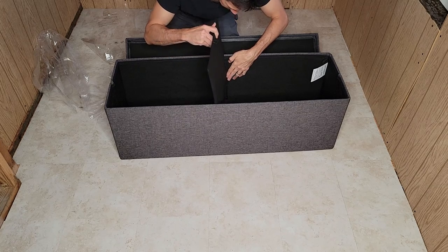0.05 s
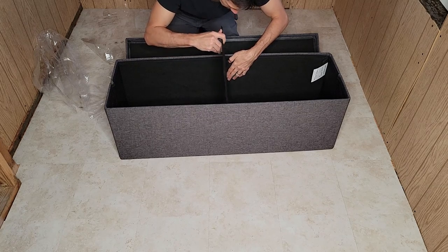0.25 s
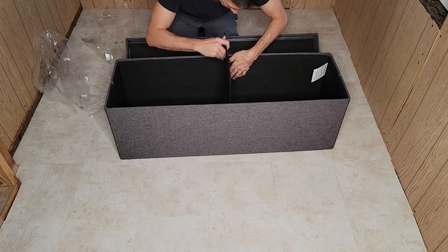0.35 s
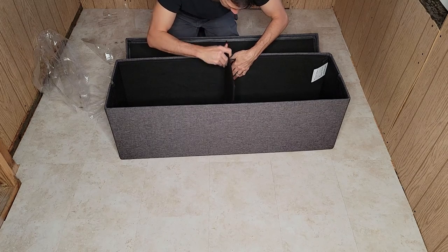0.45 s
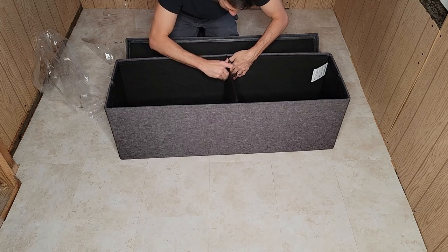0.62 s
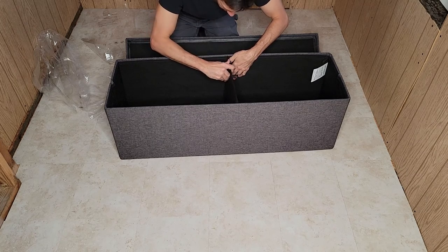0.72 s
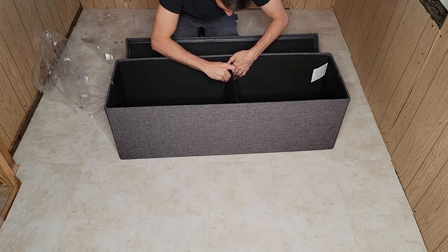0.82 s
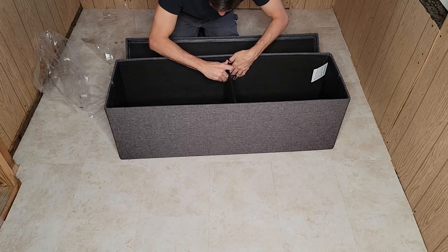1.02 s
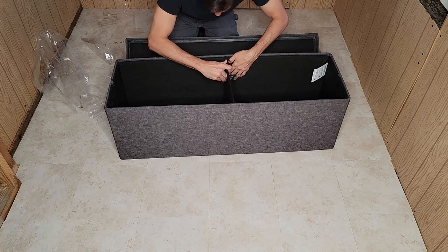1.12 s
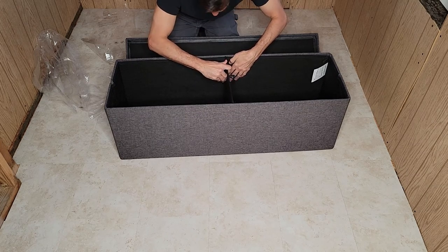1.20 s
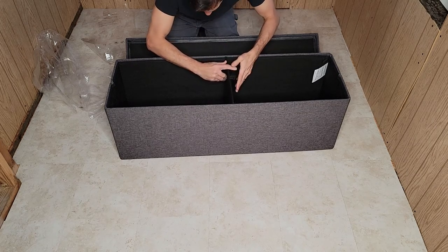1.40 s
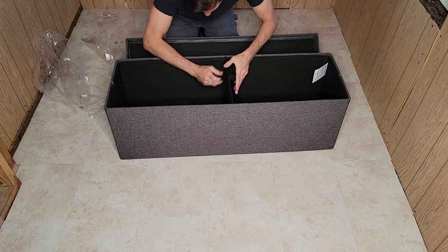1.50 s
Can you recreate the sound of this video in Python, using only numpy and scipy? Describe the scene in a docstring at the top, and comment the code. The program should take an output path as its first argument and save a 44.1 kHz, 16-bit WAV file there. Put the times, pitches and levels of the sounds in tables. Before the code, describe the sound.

In a small quiet room, a wooden divider scrapes against fabric as it is pushed into a box. It stops with a dull knock, followed by soft thumps, light taps and hands brushing cloth.

```python
"""A wooden divider panel is pushed down between the slats of a fabric-lined box, in a small quiet room.
Over a low rumble, light brushes and two faint ticks come first. From 0.2 s the edges rasp over the
weave by stick-slip friction, and the panel resonates, most when half way in. Near the bottom it binds
and grinds, landing at about 0.75 s with a dull knock. Hands then brush the fabric and press the panel
home, with soft thumps of the box floor and a few lighter knocks."""
import sys
import numpy as np
from scipy import signal
from scipy.fft import rfft, irfft, next_fast_len
from scipy.io import wavfile
from scipy.ndimage import map_coordinates

SR = 44100
rng = np.random.default_rng(int(sys.argv[2]) if len(sys.argv) > 2 else 0)


def waveform_to_disk(signal):
    """Save audio, clipped to [-1, 1], as 16-bit WAV at the path in sys.argv[1]."""
    frames = np.transpose(np.atleast_2d(signal))
    scaled = np.clip(frames, -1, 1) * 32767
    samples = np.round(scaled).astype(np.int16)
    wavfile.write(sys.argv[1], SR, samples)


N = 68355

# Relative spectral densities of the room's rumble and hiss: f/Hz, level/dB
RUMBLE_SPECTRUM = [(12, -50), (20, -40), (34, -3), (65, -3), (122, -3), (151, -16), (214, -9.5), (269, -15),
                   (292, -16.5), (321, -15.5), (382, -19), (500, -31.5), (650, -47), (1100, -120)]
AIR_SPECTRUM = [(300, 0), (700, -5.5), (1200, -5.5), (2500, -9), (6500, -10.5), (8800, -18), (12000, -26.5),
                (15500, -25)]
# Left-right correlation of the rumble: f/Hz, coefficient
RUMBLE_CORRELATION = [(30, 1), (70, 0.82), (130, 0.96), (250, 0.91), (500, 0.29)]
# Reverberation time of the room: f/Hz, T60/s
ROOM_T60 = [(150, 0.25), (800, .26), (3000, 0.34), (8000, 0.23), (15000, 0.18)]
# Left minus right level of the box's sound: f/Hz, level/dB
BALANCE = [(200, 1.5), (700, -1.5), (1300, .5), (2600, 1.5), (4200, -1), (5200, 2.5), (6800, -1),
           (8200, -3), (9400, -4.5), (12000, -10), (15000, -10.5)]
# Gain of the stereo side signal: f/Hz, level/dB
SIDE_GAIN = [(60, -1.5), (140, -1), (300, -1.5), (600, 1.5), (1100, 5), (1800, 2), (3000, 0)]
# Thumps of the box floor: t/s, level/dB, f/Hz, T60/s
FLOOR_THUMPS = [(0.754, -47, 33, .2), (0.867, -34, 104, 0.058), (0.981, -49, 50.7, 0.26)]
# Strokes on the fabric: t/s, level/dB, attack/s, hold/s, fade/(dB/s), treble gain/dB
STROKES = [(-.01, -51.5, 0.0033, 0.0083, 353, 0), (0.135, -52, .008, 0.16, 146, -3.5),
           (0.815, -56.5, 0.013, 0.038, 146, 2.5), (0.874, -54.5, 0.022, 0.013, 442, -2),
           (1.008, -65.5, 0.023, 0.043, 24, -1), (1.278, -64.5, 0.019, 0.063, 81, 4.5),
           (1.449, -56.5, .02, 0.019, 203, 5)]
# Contacts of the panel in its slot: t/s, level/dB, relative scuff level/dB
CONTACTS = [(.098, -62.5, 8), (.139, -56.5, 7), (0.674, -43, 3), (.744, -33, -9), (.752, -36.5, -6),
            (.772, -41, -7), (.912, -47.5, -2.5), (1.203, -41.5, -5.5), (1.219, -54.5, 9)]
# Modes of the struck panel and box: f/Hz, level/dB
WOOD_MODES = [(113, -8), (221, -7.5), (360, -8), (520, -9), (680, -6), (791, 0.5), (930, -0.5),
              (1184, -2.5), (1290, -2), (1530, -4), (1890, -1), (2250, 3.5), (2560, -2), (2850, 6)]
# Resonances of the rubbed panel: f/Hz, bandwidth/Hz, level/dB
PANEL_MODES = [(2760, 115, 1.5), (2910, 97, 3), (3260, 80, -4), (3450, 140, 4.5), (4150, 170, -4),
               (5460, 260, -14), (6720, 180, -10)]
# Friction envelope of the push: t/s, level/dB
PUSH_ENVELOPE = [(.2, -51), (.255, -44.5), (.29, -41), (.325, -42), (.375, -38), (.397, -37.5), (.44, -38),
                 (.505, -36), (.545, -37.5), (.58, -36.5), (.605, -38.5), (.64, -36.5), (.715, -36),
                 (.75, -38.5), (.78, -47.5)]
# Relative spectral densities of brushed cloth, weave, fine fibres and coarse scrape: f/Hz, level/dB
CLOTH_SPECTRUM = [(400, -9), (800, -4.5), (1500, -4.5), (2700, 0.5), (4300, -0.5), (7300, -5), (8800, -13),
                  (12000, -19.5), (15500, -20)]
RASP_SPECTRUM = [(200, -23), (550, -16.5), (1000, -17), (1400, -10), (2100, -9), (2750, -1.5), (3500, -1.5),
                 (4300, -2.5), (5300, -5.5), (7400, -6.5), (9000, -15.5), (12000, -23.5), (15500, -28)]
FIBRE_SPECTRUM = [(2000, -30), (6000, 4), (8000, 6), (11000, -1.5), (15500, -4)]
GRIND_SPECTRUM = [(100, -30), (300, -18), (550, -4.5), (780, -6.5), (1200, -2.5), (1900, -4), (3000, -18),
                  (8000, -39)]


def amp(db):
    """Amplitude ratio of a level in decibels."""
    return 10 ** (np.asarray(db) / 20)


def unit(x):
    """Normalisation to rms 1."""
    return x / np.sqrt(np.mean(x ** 2) + 1e-20)


def along(points, hz):
    """Interpolation of (f/Hz, value) points on a logarithmic frequency axis."""
    f, values = np.transpose(points)
    return np.interp(np.log(hz + 1), np.log(f + 1), values)


def clock(onset_s=0):
    """Seconds elapsed since an onset, zero before it."""
    return np.maximum(np.arange(N) / SR - onset_s, 0)


def wobble(knots_per_s):
    """Smooth random modulation by spline interpolation."""
    return map_coordinates(rng.standard_normal(1024), [clock() * knots_per_s], mode="wrap")


def filtered(x, response):
    """Linear filtering: the spectrum is multiplied by a frequency response."""
    size = next_fast_len(N + SR // 2)
    return irfft(rfft(x, size) * response(np.fft.rfftfreq(size, 1 / SR)), size)[..., :N]


def coloured(x, spectrum):
    """Spectral shaping, normalised to rms 1."""
    return unit(filtered(x, lambda hz: amp(along(spectrum, hz))))


def background():
    """Superposition of partly coherent rumble, a modulated hum and incoherent hiss."""
    def mid_side_gains(hz):
        angle = np.arccos(np.clip(along(RUMBLE_CORRELATION, hz), -1, 1)) / 2
        return np.array([np.cos(angle), np.sin(angle)])

    mid, side = filtered(rng.standard_normal((2, N)), mid_side_gains)
    rumble = amp(-56) * coloured(np.array([mid + side, mid - side]), RUMBLE_SPECTRUM)
    hum_hz = 78.5
    hum = amp(-60 + 0.67 * wobble(5.4)) * np.sin(2 * np.pi * hum_hz * clock() + wobble(7.94))
    hiss = amp(-61) * coloured(rng.standard_normal((2, N)), AIR_SPECTRUM)
    return rumble + hum + hiss


def room(x):
    """Time-varying reverberation: direct sound arrives on the right first, then close walls reflect."""
    early_db, early_t60_s, wet_db, left_lag_s = -1, 0.067, 6, 0.000502
    hop = round(0.008 * SR)
    frames = np.lib.stride_tricks.sliding_window_view(np.pad(x, (0, hop)), 2 * hop)[::hop, None]
    frames = frames * np.sqrt(np.hanning(2 * hop))
    # Each frame has its own impulse response of decaying noise.
    noise = rng.standard_normal((len(frames), 2, SR // 5)).astype(np.float32)
    hz, t, spectra = signal.stft(noise, SR, nperseg=256)
    wall_decay = amp(-60 * t / along(ROOM_T60, hz)[:, None])
    box_decay = amp(early_db - 60 * t / early_t60_s)
    tails = signal.istft(spectra * (wall_decay + box_decay).astype(np.float32), SR, nperseg=256)[1]
    tails /= np.linalg.norm(tails, axis=2, keepdims=True)
    wet = np.zeros((2, N + SR))
    for k, echo in enumerate(signal.fftconvolve(frames, tails, axes=2)):
        wet[:, k * hop:k * hop + echo.shape[1]] += echo
    direct = filtered(x, lambda hz: np.exp(1j * np.pi * hz * left_lag_s * np.array([[-1], [1]])))
    return np.sqrt(2) * (direct + amp(wet_db) * wet[:, :N]) / np.hypot(1, amp(wet_db))


def thumps():
    """Damped oscillation: the box floor gives softly under pressure."""
    attack_s = 0.0082
    out = np.zeros(N)
    for onset, db, hz, t60 in FLOOR_THUMPS:
        t = clock(onset)
        envelope = amp(db - 60 * t / t60) * (1 - np.exp(-t / attack_s))
        out += envelope * np.sin(2 * np.pi * hz * t)
    return out


def slips(per_s=5000, scatter_db=4):
    """Stick-slip friction as shot noise: tiny impulses of random time, sign and size."""
    impulses = (rng.random(N) < per_s / SR) * rng.choice([-1, 1], N)
    return unit(impulses * amp(scatter_db * np.clip(rng.standard_normal(N), -2, 2)))


def brushes():
    """Friction noise of hands on cloth: each stroke swells, holds and fades at its own brightness."""
    shelf_hz = 8100
    out = np.zeros(N)
    for onset, db, attack, hold, fade, treble_db in STROKES:
        t = clock(onset)
        cloth = coloured(slips(per_s=7000, scatter_db=3), CLOTH_SPECTRUM)
        cloth = filtered(cloth, lambda hz: amp(treble_db * np.minimum(hz / shelf_hz, 1) ** 2))
        envelope = amp(db - fade * np.maximum(t - attack - hold, 0)) * np.minimum(t / attack, 1)
        out += envelope * unit(cloth)
    return out


def knocks():
    """Impact excitation: padded contacts scuff the cloth and ring the wood; high modes die first."""
    t60_at_1khz_s, scuff_t60_s, attack_s = 0.029, 0.033, 0.0013
    out = np.zeros(N)
    for onset, db, scuff_db in CONTACTS:
        t = clock(onset)
        ring = np.zeros(N)
        for hz, mode_db in WOOD_MODES:
            t60 = t60_at_1khz_s / np.sqrt(hz / 1000)
            ring += amp(mode_db - 60 * t / t60) * np.sin(2 * np.pi * (hz * t + rng.random()))
        scuff = amp(scuff_db - 60 * t / scuff_t60_s) * coloured(rng.standard_normal(N), CLOTH_SPECTRUM)
        out += amp(db) * (1 - np.exp(-t / attack_s)) * (0.5 * ring + scuff)
    return out


def panel_response(hz):
    """Modal superposition: the panel responds as a sum of second-order resonators."""
    return sum(amp(db) * 1j * hz * width / (centre ** 2 - hz ** 2 + 1j * hz * width)
               for centre, width, db in PANEL_MODES)


def slide():
    """Sliding friction and forced vibration: one push drives rasp, panel ring, fibre hiss and grind."""
    start_s, halfway_s, bind_s, stop_s, ring_width_s = 0.234, 0.51, 0.71, 0.7767, 0.1
    fade_db_per_s, tighten_db_per_s, bind_db_per_s = 495, 25.5, 97
    t = clock()
    fade_db = fade_db_per_s * (np.maximum(start_s - t, 0) + clock(stop_s))
    judder_db = 0.64 * wobble(knots_per_s=69.8)
    push = amp(np.interp(t, *np.transpose(PUSH_ENVELOPE)) - fade_db + judder_db)
    rasp = amp(-1) * coloured(slips(), RASP_SPECTRUM)
    ring_swell = np.exp(-0.5 * ((t - halfway_s) / ring_width_s) ** 2)
    ring = amp(-2) * ring_swell * unit(filtered(slips(), panel_response))
    # Hiss grows as the slot tightens, grind as the panel binds, until it stops.
    travel_s = np.minimum(t, stop_s)
    hiss_db = -13.5 + tighten_db_per_s * (travel_s - halfway_s)
    grind_db = -11.5 + bind_db_per_s * (travel_s - bind_s)
    hiss = amp(hiss_db) * coloured(slips(), FIBRE_SPECTRUM)
    grind = amp(grind_db) * coloured(slips(per_s=830, scatter_db=4.5), GRIND_SPECTRUM)
    return push * (rasp + ring + hiss + grind)


def scene():
    """Superposition of the reverberant box, its top treble weaker on the left, thumps and background."""
    box = room(slide() + brushes() + knocks())
    box = filtered(box, lambda hz: amp(along(BALANCE, hz) * np.array([[0.5], [-0.5]])))
    return box + thumps() + background()


def record(dry):
    """Mid-side filtering widens the midrange, and an ideal low-pass limits the band."""
    cutoff_hz = 15800
    mid = (dry[0] + dry[1]) / 2
    side = filtered((dry[0] - dry[1]) / 2, lambda hz: amp(along(SIDE_GAIN, hz)))
    return filtered(np.array([mid + side, mid - side]), lambda hz: hz < cutoff_hz)


dry = scene()
out = record(dry)
waveform_to_disk(out)
```